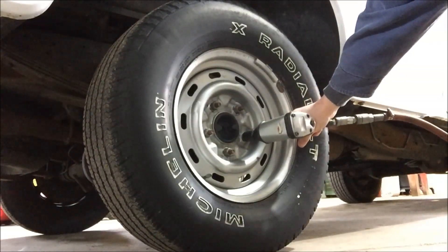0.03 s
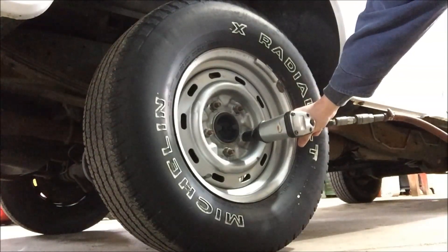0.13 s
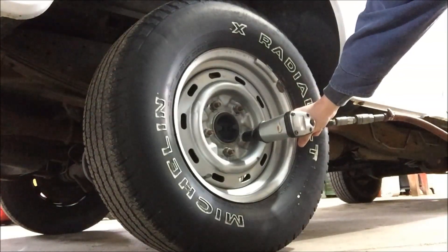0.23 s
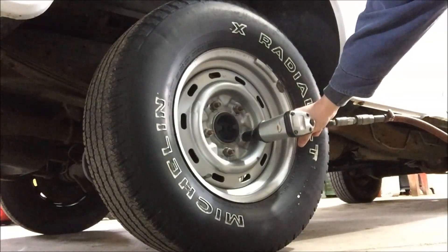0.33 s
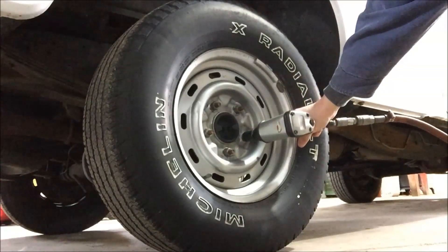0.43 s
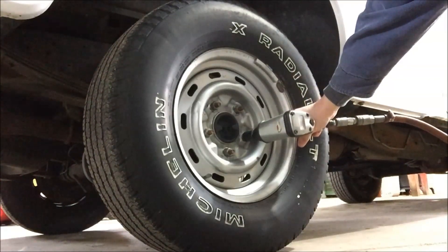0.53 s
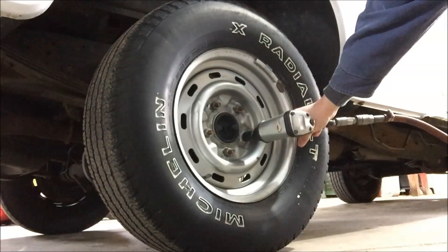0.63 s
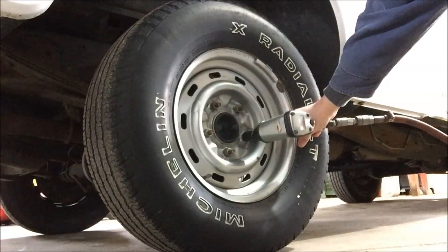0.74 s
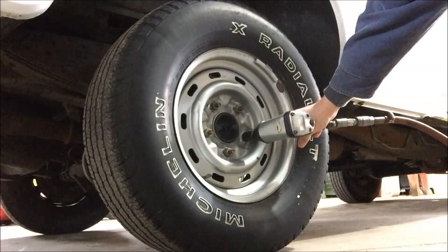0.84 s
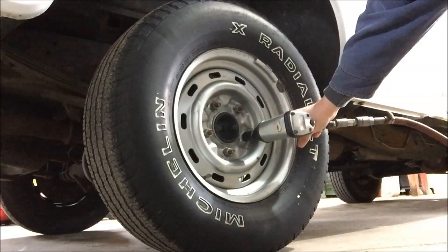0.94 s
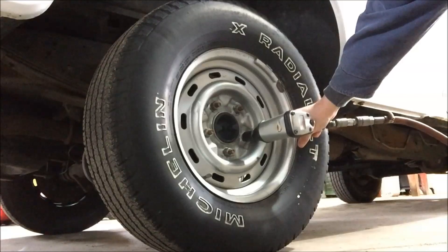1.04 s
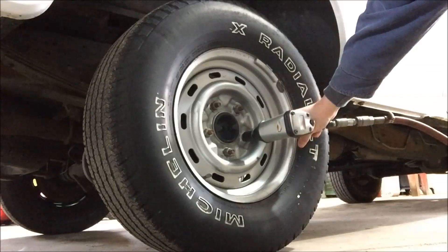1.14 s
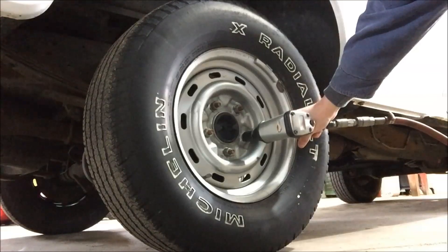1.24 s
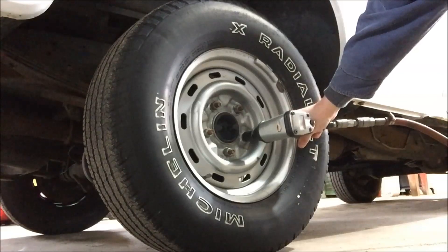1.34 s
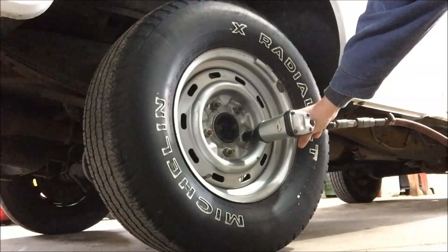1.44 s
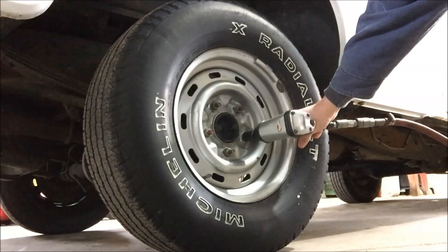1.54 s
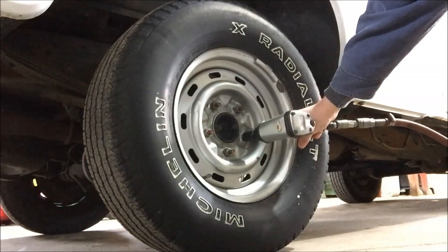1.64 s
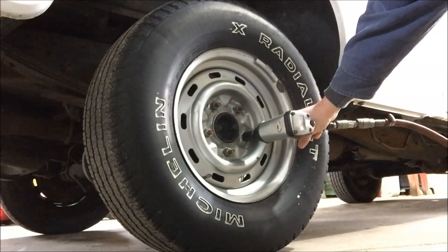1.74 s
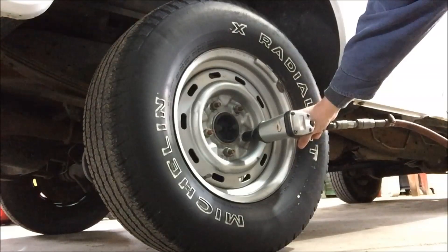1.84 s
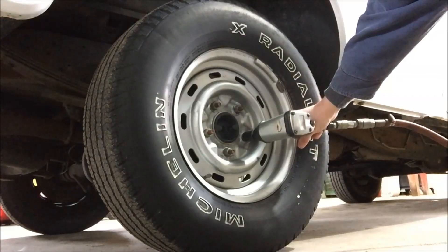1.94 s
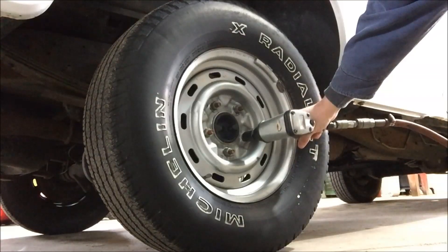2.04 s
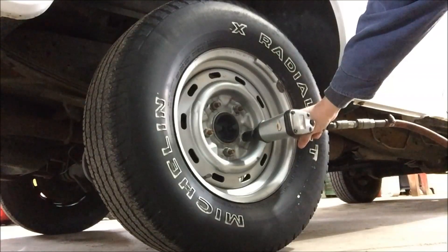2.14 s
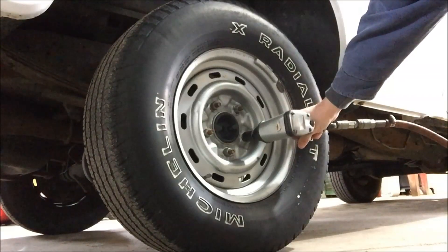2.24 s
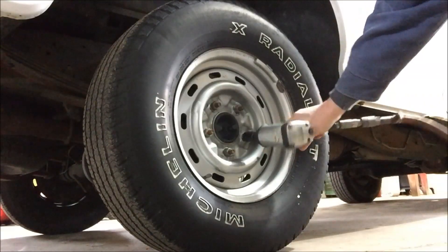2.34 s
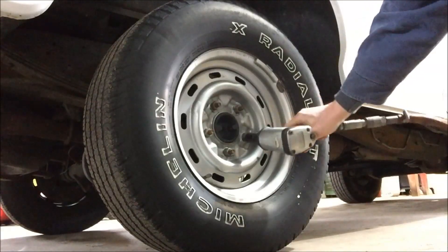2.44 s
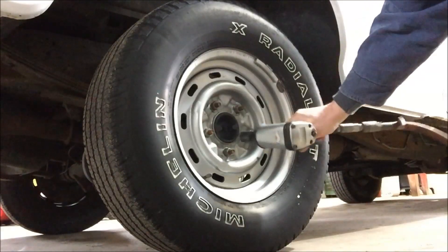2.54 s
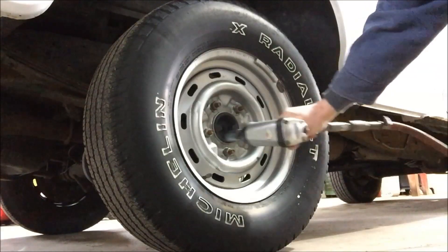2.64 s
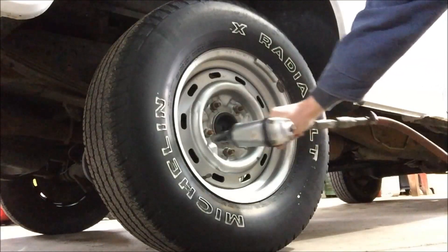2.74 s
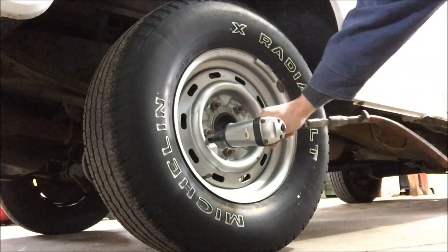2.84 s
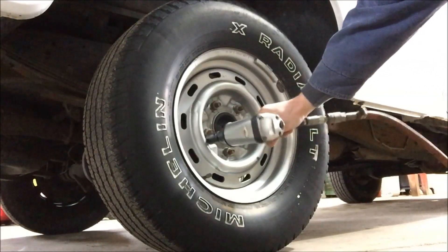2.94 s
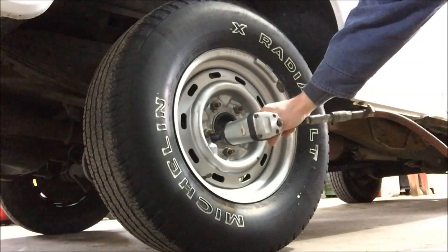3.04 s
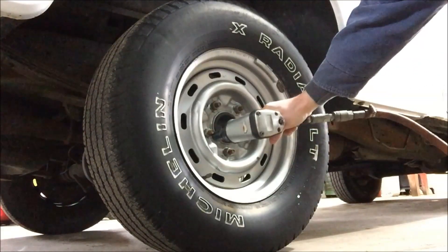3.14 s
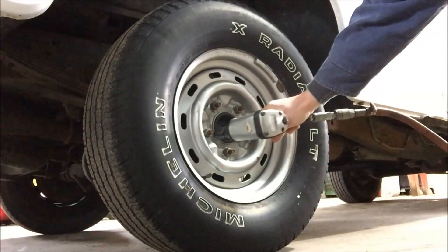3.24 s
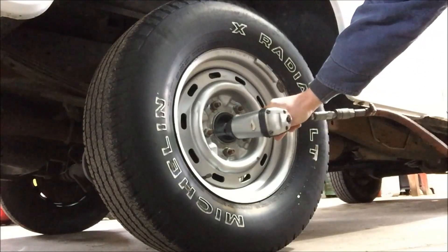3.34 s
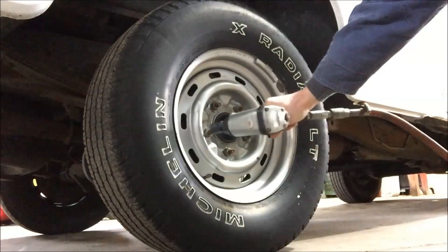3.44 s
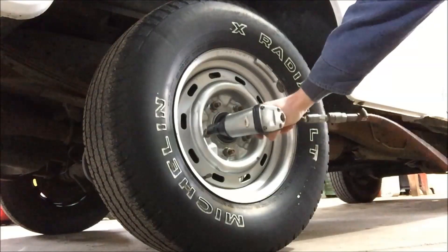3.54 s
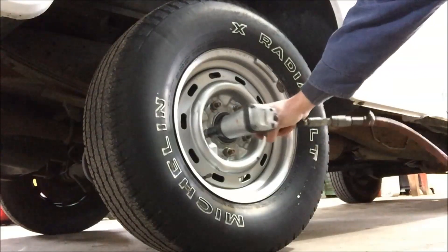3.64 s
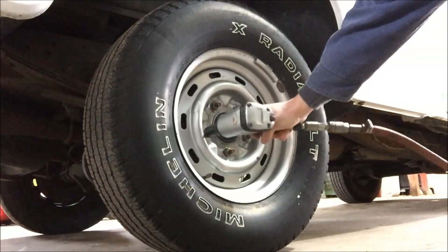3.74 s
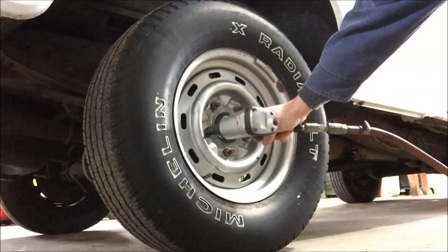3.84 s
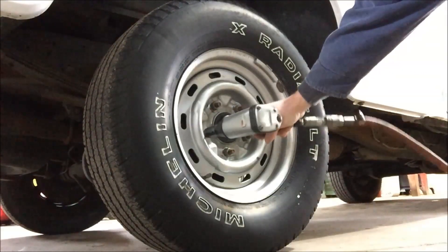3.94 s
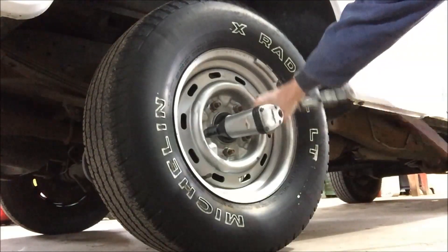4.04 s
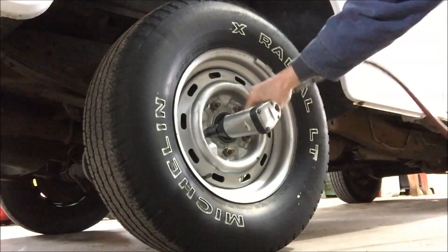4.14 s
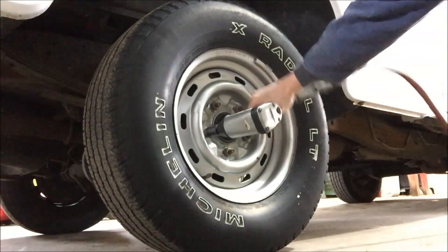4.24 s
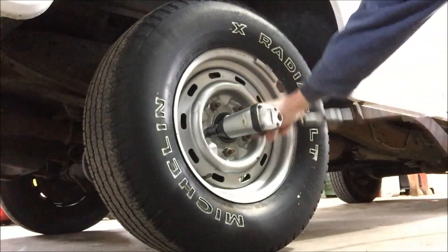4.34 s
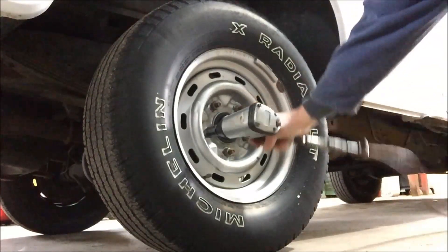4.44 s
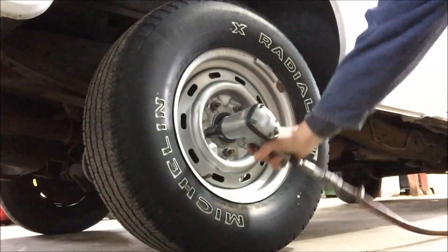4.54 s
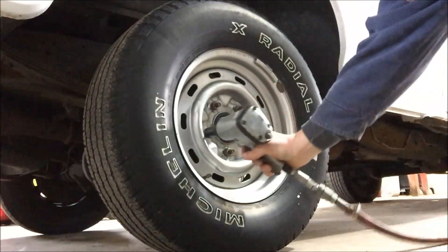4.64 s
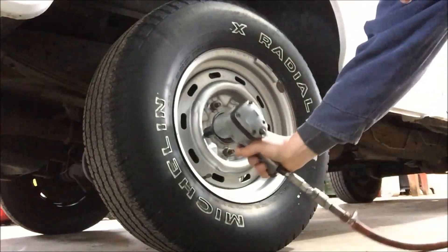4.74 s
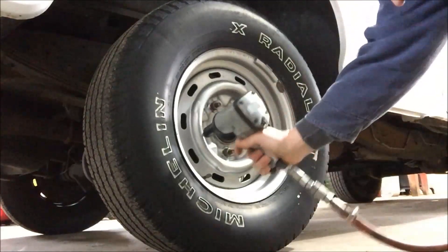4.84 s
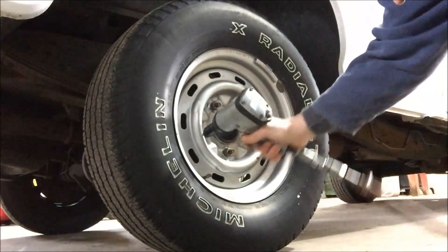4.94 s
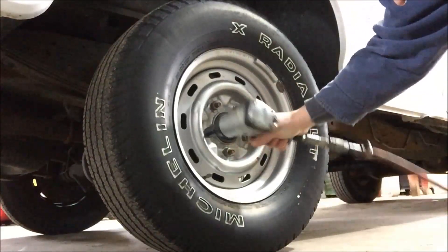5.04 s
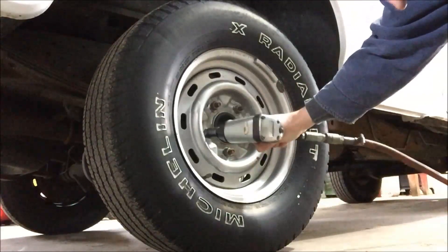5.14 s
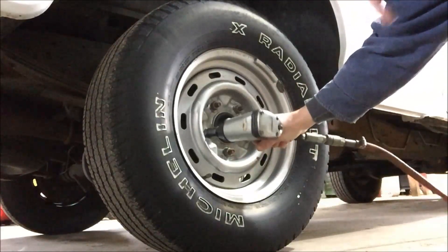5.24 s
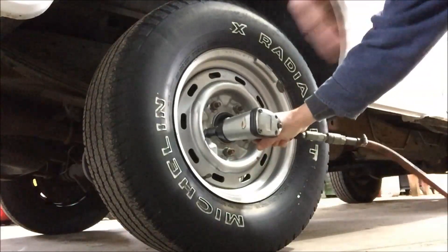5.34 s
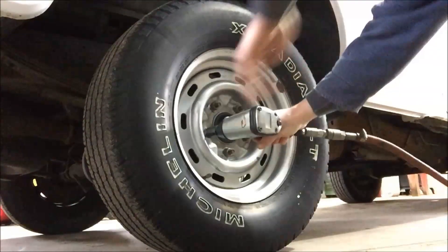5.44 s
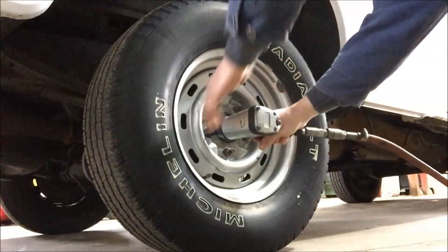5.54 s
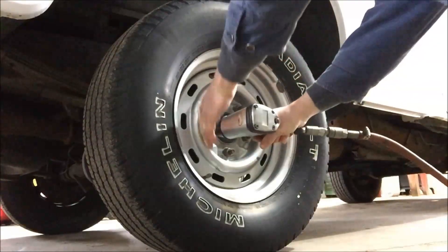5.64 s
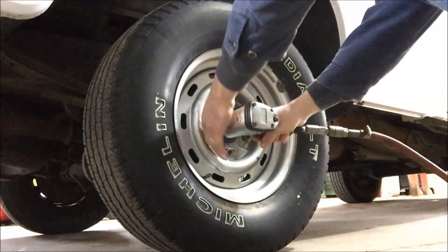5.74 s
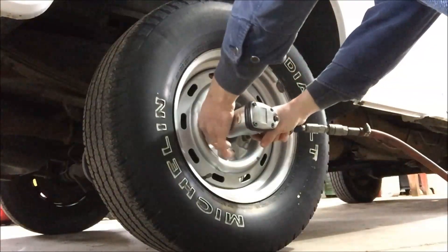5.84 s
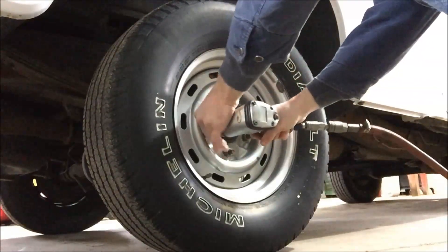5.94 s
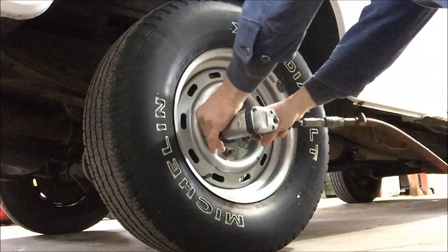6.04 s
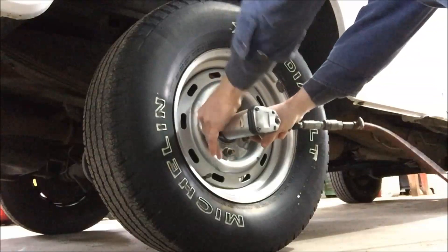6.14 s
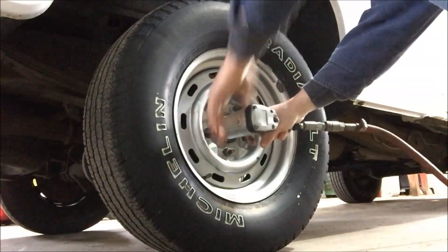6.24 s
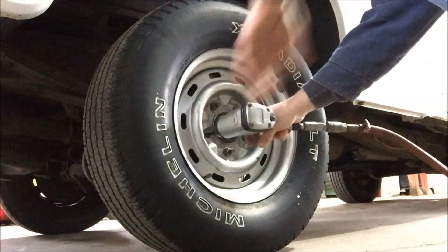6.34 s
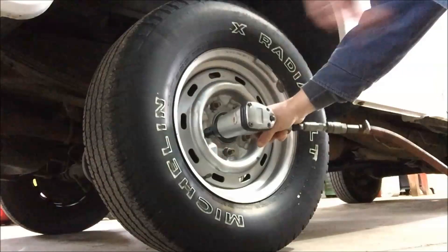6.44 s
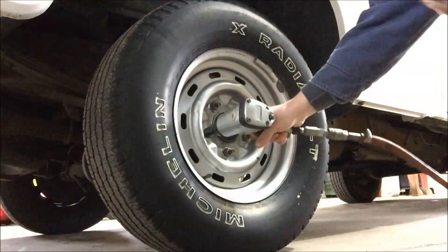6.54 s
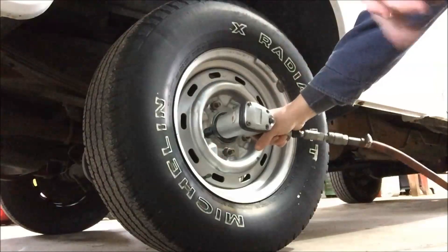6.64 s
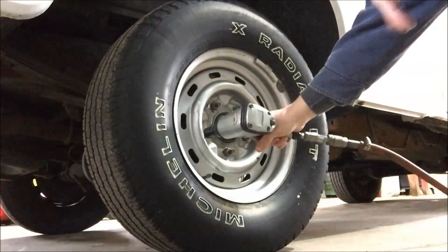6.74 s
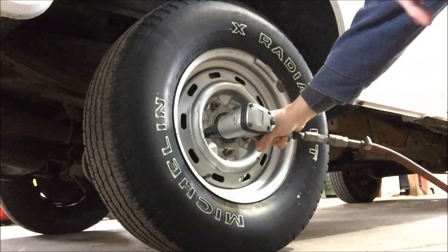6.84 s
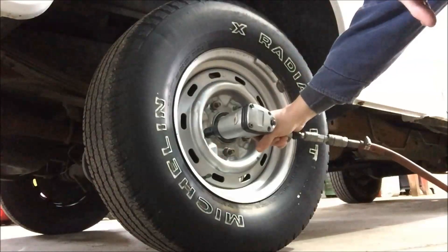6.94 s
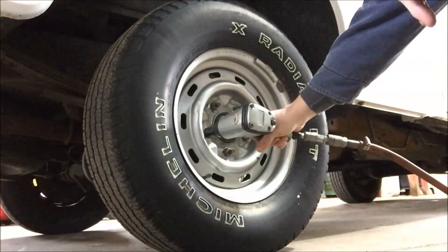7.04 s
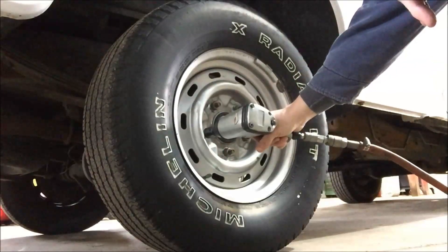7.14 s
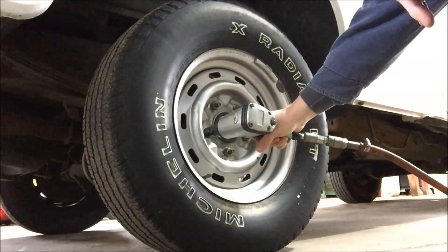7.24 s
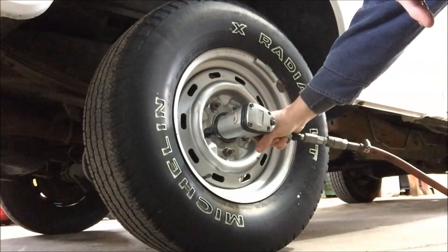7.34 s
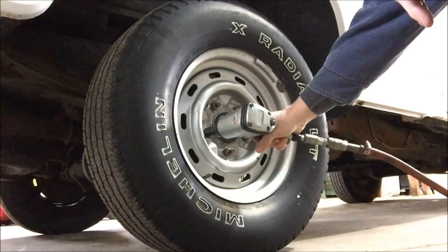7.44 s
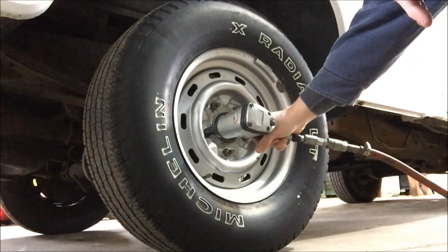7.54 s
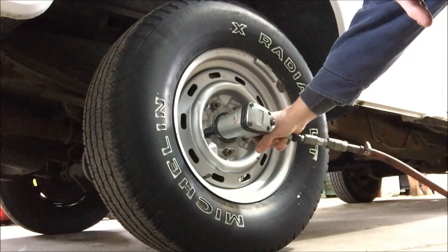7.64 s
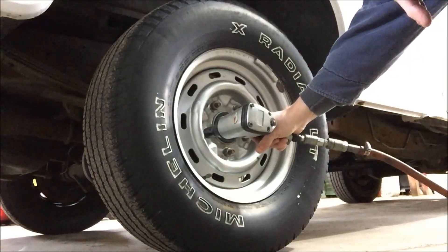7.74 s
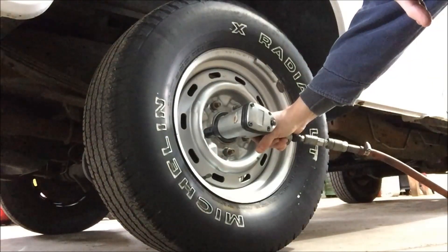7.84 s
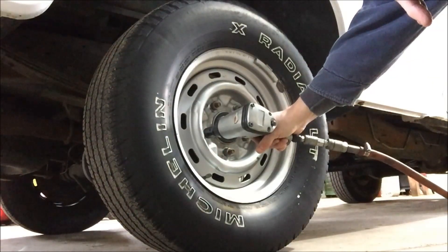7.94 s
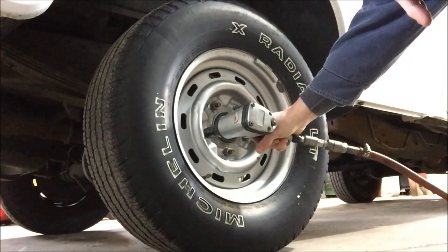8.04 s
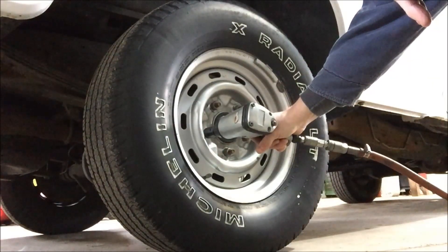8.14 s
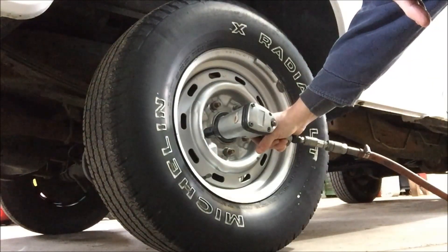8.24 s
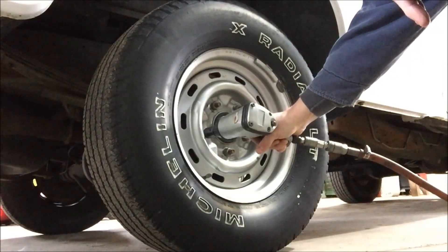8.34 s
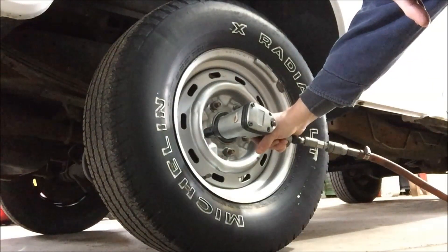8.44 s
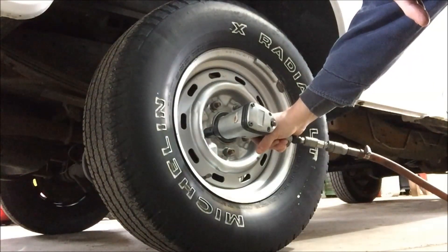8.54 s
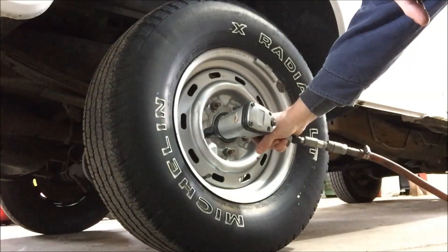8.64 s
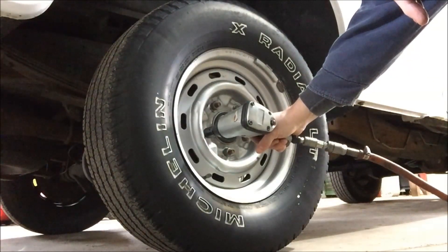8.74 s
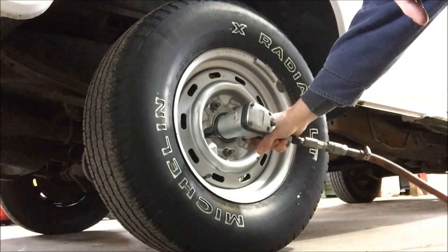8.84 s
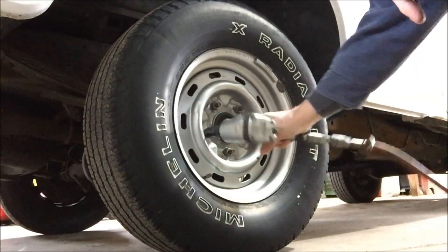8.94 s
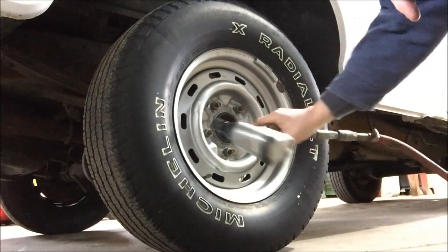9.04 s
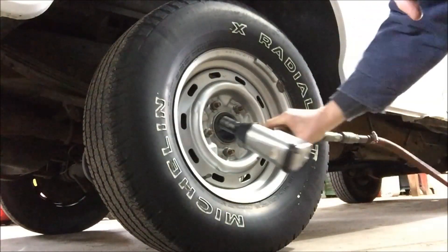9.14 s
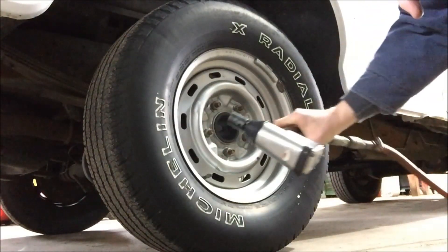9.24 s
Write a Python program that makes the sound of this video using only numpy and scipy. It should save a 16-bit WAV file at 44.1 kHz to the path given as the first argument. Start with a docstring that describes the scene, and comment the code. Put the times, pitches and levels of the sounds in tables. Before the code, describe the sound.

Air impact wrench hammers loudly on a stuck wheel nut, stops, clanks across to another nut, then hammers again in an echoing garage.

```python
"""In a garage, a pneumatic impact wrench hammers on a stuck lug nut, is knocked onto another nut and hammers again.
Each blow is a noisy steel clank, a treble crack, ringing modes of socket and wheel and a low thump.
Between blows the vane motor runs up from a stall in a train of puffs under hissing exhaust.
Jolts, a faint whine of the coasting rotor, a coupling leak, scrapes, dull knocks, soft bumps and room noise follow.
Wrench, jolts, scrapes and dull knocks get echoes and a tail; leak, whine, bumps and room noise stay dry."""
import sys
import numpy as np
from scipy import signal
from scipy.io import wavfile
from scipy.ndimage import uniform_filter1d

SR = 44100
rng = np.random.default_rng(int(sys.argv[2]) if len(sys.argv) > 2 else 0)


def unload_wav(signal):
    """Save mono or channel-first audio to the path in sys.argv[1] as 16-bit WAV at rate SR, clipped to [-1, 1]."""
    wavfile.write(
        sys.argv[1],
        SR,
        np.round(np.clip(np.atleast_2d(signal).T, -1, 1) * 32767).astype(np.int16),
    )


N = 409997
TIME_S = np.arange(N) / SR
NUT_CHANGE_S = 2.8

# Runs of evenly spaced hammer blows. Each row: first blow in seconds, last blow in seconds, number of blows,
# then relative levels of clank, treble crack and motor run-up in dB.
BLOW_RUNS = [(0.036, 0.15, 2, -5.5, -16, -23), (0.242, 0.433, 3, -7, -16, -20.5),
             (0.522, 0.886, 5, -6.5, -15, -19), (0.998, 1.279, 4, -7, -16, -20.5),
             (1.394, 2.208, 8, -6.5, -14.5, -25), (2.302, 2.302, 1, -9, -14, -21.5),
             (6.532, 6.532, 1, -9, -23, -31), (6.558, 6.598, 2, 1, -7, -11),
             (6.634, 6.672, 2, -4.5, -14, -16), (6.783, 7.098, 5, -0.5, -16.5, -23),
             (7.176, 7.283, 2, -4.5, -14, -29), (7.39, 7.468, 2, -5.5, -12.5, -27),
             (7.581, 7.687, 2, -2.5, -15, -29), (7.766, 7.847, 2, -3, -17, -31),
             (7.956, 8.114, 3, -4, -14.5, -27.5), (8.226, 8.305, 2, -4, -14.5, -27.5),
             (8.421, 8.5, 2, -5, -13, -27.5), (8.621, 8.774, 3, -3.5, -14, -29.5),
             (8.886, 8.886, 1, -1.5, -25, -27.5)]
# Second catch of the hammer, a row per nut: delay in seconds, then clank, crack and run-up in dB re the full blow.
SECOND_CATCH = [(.045, -1.5, 2, -8.5), (.036, -6, 0, -5)]
CATCH_MIN_GAP_S, CATCH_MAX_GAP_S = 0.085, 0.2  # shorter: regular blows; longer: motor stopped
BLOW_SPREAD_DB = 0.86

# Trigger pulls. Each row: open in seconds, shut in seconds.
TRIGGER_PULLS = [(-1, 2.328), (6.53, 8.928)]
# Air of each pull: relative level in dB.
PULL_AIR_DB = [-19.5, -18]
LOUD_START_DB, SETTLE_S = 10, 0.14  # the hiss starts louder and settles
VALVE_OPEN_S, VALVE_SHUT_DB_PER_S = 0.011, 1000
VANE_HZ, RUN_UP_S = 172, 0.042  # puff rate at full speed, time constant from a stall

# Jolts from trigger blips and from the socket meeting nuts and wheel. Each row: time in seconds,
# then relative levels of clank, treble crack and wheel thump in dB.
JOLTS = [(2.364, -10, -19, -29), (2.494, -22, -22, -52), (2.631, -30, -46, -51), (2.908, -3.5, -3.5, -11),
         (2.986, -7.5, -20, -20), (3.093, -17, -23, -30.5), (3.149, -19, -24, -34), (3.193, -23, -48, -39),
         (3.335, -31.5, -49, -61), (3.542, -29, -56, -56), (3.589, -2, -5, -14.5), (3.732, -3, -5, -21),
         (3.747, -10, -10, -32), (3.769, -17, -19, -20.5), (3.812, -11.5, -14, -19), (4.05, -25, -44, -33),
         (4.071, -10.5, -19.5, -19), (4.586, -27, -27, -40), (4.62, -29, -43, -35),
         (4.695, -27, -53, -30.5), (5.149, -42, -56, -33), (5.193, -41, -57, -28.5), (5.528, -50, -70, -43),
         (5.979, -30, -60, -52), (6.011, -28, -54, -42), (6.072, -15.5, -26, -33), (6.107, -16.5, -26, -19),
         (6.128, -41, -27, -28), (6.226, -26.5, -58, -53), (8.996, -11.5, -13, -36)]
# Modes of socket and wheel. Each row: frequency in Hz, T60 in seconds before damping,
# then relative levels in dB on the first nut, on the second nut and knocked loose.
STEEL_MODES = [(1015, .3, -21.5, -17.5, -15), (1337, 0.24, -23.5, -16, -18.5),
               (1656, 0.31, -10, -25, -21.5), (1940, 0.34, -14, -14.5, -12.5),
               (2260, .3, -22, -30.5, -14.5), (2800, .1, -18, -11, -11.5), (3097, 0.12, -0.5, 8, 6),
               (3570, 0.087, -18, -10.5, -0.5), (3900, .15, -22.5, -10, -16), (5370, 0.4, -8.5, -19, -20.5),
               (5490, 0.1004, -22.5, -20, -12), (6130, .22, -9.5, -10.5, -17.5),
               (6700, 0.16, -11.5, -13.5, -15.5), (7400, .2, -9.5, -4, -17.5), (8550, .3, -14, -20, -24)]
LOOSE_SEAT = 2
# Rotor coasts. Each row: start in seconds, length in seconds, initial whine in Hz, start and end level in dB.
ROTOR_COASTS = [(2.998, 0.73, 2174, -70, -60), (4.088, 1.2, 2250, -72, -78)]
COAST_SAG_HZ_PER_S = 740

# Coupling leaks while the hose is bent. Each row: start in seconds, end in seconds, level in dB.
HOSE_LEAKS = [(4.6, 5.08, -55.5), (5.4, 5.6, -70), (6.01, 6.21, -59), (9.13, 9.3, -51.5)]
LEAK_RISE_S, LEAK_FALL_DB_PER_S, LEAK_REST_DB, LEAK_SPUTTER_DB = 0.073, 93, -84, 2
# Scrapes of the socket and dull knocks of the tool body on the wheel.
# Each row: start in seconds, end in seconds, relative level in dB.
SCRAPES_AND_KNOCKS = [(3.09, 3.15, -36.5), (4.66, 4.7, -48), (5.152, 5.16, -48), (5.195, 5.222, -53),
                      (5.4, 5.45, -54), (6.05, 6.14, -40)]
SCRAPE_RISE_S, SCRAPE_FALL_DB_PER_S = 0.012, 221
# Shifts of the tool against the wheel. Each row: start in seconds, end in seconds, level in dB.
TOOL_SHIFTS = [(3.0, 3.22, -43.5), (3.7, 4.0, -44), (4.15, 4.28, -49), (4.66, 4.8, -49), (4.92, 5.3, -56),
               (6.1, 6.25, -51), (9.05, 9.3, -50)]
SHIFT_RISE_S, SHIFT_FALL_DB_PER_S, SHIFT_REST_DB = 0.14, 54, -64.5
BUMPS_PER_S, BUMP_DB = 9, 4  # bump level re the rub

# Clank of the gripped nut. Each row: frequency in Hz, relative gain in dB.
FIRST_NUT_CLANK = [(150, -9.5), (330, 2.5), (520, -8), (1000, -4.5), (1400, -12), (1800, -4), (2500, -4.5),
                   (3600, 0.5), (4900, -7.5), (7000, -7.5), (12000, -27.5)]
SECOND_NUT_CLANK = [(150, -4.5), (330, -5), (600, -12.5), (1000, -3), (1500, -12.5), (2000, -6.5),
                    (2400, -5), (2850, 3), (3800, -0.5), (4800, -9.5), (7000, -4.5), (12000, -25)]
# Treble crack of a blow. Each row: frequency in Hz, relative gain in dB.
BLOW_CRACK = [(2500, -25), (4500, -14), (6200, 0.5), (7600, 2), (10300, -3), (12000, 1), (15800, -8)]
# Vane puffs on each nut. Each row: frequency in Hz, relative gain in dB.
FIRST_NUT_PUFF = [(25, -37.5), (60, -5.5), (120, -11), (165, -4.5), (200, -8), (270, -1.5), (350, 1),
                  (460, -8), (650, -8.5), (1050, -12), (1600, -27.5), (6000, -57)]
SECOND_NUT_PUFF = [(25, -30), (60, -6.5), (120, -8), (165, -5.5), (200, -3.5), (240, 3), (340, 0.5),
                   (460, -10.5), (700, -14), (1100, -16.5), (2000, -32), (6000, -61)]
# Exhaust hiss on each nut. Each row: frequency in Hz, relative gain in dB.
FIRST_NUT_EXHAUST = [(300, -20), (900, -17), (1450, -6.5), (1750, -2.5), (2400, -3.5), (3200, -0.5),
                     (4200, 1), (4900, -4.5), (6200, -0.5), (7600, 2.5), (9000, -1.5), (10300, -6.5),
                     (11800, -1.5), (15800, -10)]
SECOND_NUT_EXHAUST = [(300, -7.5), (900, -14.5), (1500, -7), (2350, -3.5), (2800, 5.5), (3600, 3.5),
                      (4800, 0), (5800, 2.5), (7400, 3), (8600, -0.5), (9500, 3), (10400, -3.5),
                      (11600, 0.5), (15800, -4)]
# Clank and treble crack of a jolt. Each row: frequency in Hz, relative gain in dB.
JOLT_CLANK = [(150, -16), (330, -1.5), (480, 0), (620, -3), (800, -2.5), (1200, 0.5), (1550, -5.5),
              (2050, -0.5), (2500, 0.5), (3100, 1.5), (3800, -0.5), (4800, -11.5), (7000, -10),
              (12000, -33)]
JOLT_CRACK = [(2500, -27.5), (4500, -15), (6600, -1.5), (8000, -2), (10300, -3.5), (12000, -7),
              (15800, -14.5)]
# Low shudder and rub of the wheel. Each row: frequency in Hz, relative gain in dB.
WHEEL_THUMP = [(25, -40.5), (60, -15), (130, -9.5), (190, -6), (240, 0), (300, -0.5), (380, -11),
               (500, -29), (1000, -27), (4000, -63)]
# Leaking air. Each row: frequency in Hz, relative gain in dB.
LEAK_HISS = [(500, -14.0), (2200, -2), (5000, -1), (8000, 2), (12000, 1.5), (15000, 4.5)]
# Scrapes and dull knocks. Each row: frequency in Hz, relative gain in dB.
SCRAPE_NOISE = [(300, -16.5), (600, -7.5), (850, 2.5), (1200, -0.5), (1600, -7.5), (3000, -12.5),
                (7000, -28), (14000, -32)]
# Quiet of the garage. Each row: frequency in Hz, relative gain in dB.
ROOM_NOISE = [(15, -43.5), (25, -9.5), (75, 10.5), (231, -9), (326, -11.5), (769, -22.5), (1630, -18.5),
              (1760, -16.5), (2930, -18.5), (4750, -24), (15000, -35.5)]
ROOM_NOISE_DB = -55
# Decay of the garage tail. Each row: frequency in Hz, T60 in seconds.
GARAGE_T60 = [(100, 1), (280, 0.67), (600, 0.72), (1500, 1), (3200, 0.67), (6400, 0.71), (9000, 0.39),
              (14000, .38)]
BAND_LIMIT_HZ = 15880


def blows():
    """Rows of time in s and clank, crack, run-up in dB: full blows, and a second catch in long gaps of a run."""
    full = np.array([(s, *levels_db) for first, last, count, *levels_db in BLOW_RUNS
                     for s in np.linspace(first, last, round(count))])
    gap_s = np.diff(full[:, 0])
    slipped = full[:-1][(gap_s > CATCH_MIN_GAP_S) & (gap_s < CATCH_MAX_GAP_S)]
    nut = (slipped[:, 0] > NUT_CHANGE_S).astype(int)
    rows = np.vstack([full, slipped + np.array(SECOND_CATCH)[nut]])
    rows = rows[np.argsort(rows[:, 0])]
    uneven_db = BLOW_SPREAD_DB * rng.standard_normal(rows[:, 1:].shape)
    return np.column_stack([rows[:, 0], rows[:, 1:] + uneven_db])


def airflow():
    """Gain of the air: the hiss starts louder, settles within a fraction of a second and dies as the trigger shuts."""
    flow = np.zeros(N)
    for (start, end), db in zip(TRIGGER_PULLS, PULL_AIR_DB):
        extra_db = LOUD_START_DB * np.exp(-np.maximum(TIME_S - start, 0) / SETTLE_S)
        flow += held([(start, end, db)], VALVE_OPEN_S, VALVE_SHUT_DB_PER_S) * amp(extra_db)
    return flow


def hammer(strikes, air):
    """Full blows on the anvil; in longer gaps the hammer rebounds and clips the anvil lightly."""
    s, clank_db, crack_db, run_up_db = strikes.T
    force = contacts(s, clank_db - 5.5, chatter_s=0.0072, ring_s=0.025, ring_db=-11.5, rise_s=0.002496)
    crack = contacts(s, crack_db + 3.5, chatter_s=0.007, ring_s=0.01, ring_db=-23.5, rise_s=0.002)

    # rebounds split each gap into steps of about 32 ms
    rebounds_s = np.concatenate([np.linspace(a, b, max(round((b - a) / 0.032), 1) + 1)[1:-1]
                                 for a, b in zip(s, s[1:])])
    late, size = rng.standard_normal((len(rebounds_s), 2)).T
    ticks = air * contacts(rebounds_s + 0.002 * late, 6 + 1.8 * size, chatter_s=0.005, ring_s=0.01, ring_db=-24.5)

    clank = colour_by_nut(force + amp(-9.5) * ticks, FIRST_NUT_CLANK, SECOND_NUT_CLANK)
    nut = (s > NUT_CHANGE_S).astype(int)
    ring = ringing(s, clank_db - 17.5, nut, damping=1, spread_db=1.5)
    thump = thumps(s, run_up_db - 2.0, hz=255.2, rise_s=0.0041)
    return clank + ring + colour(crack + ticks, BLOW_CRACK) + thump


def motor(strikes, air):
    """Each blow stalls the rotor; it runs up again, and every vane lets out a puff and a spit of hiss."""
    s, _, _, run_up_db = strikes.T
    count = np.searchsorted(s, TIME_S)
    coming = np.minimum(count, len(s) - 1)
    since_s = TIME_S - np.append(0, s)[count]
    speed = np.tanh(since_s / RUN_UP_S)
    uneven = (1 + 0.06 * rng.standard_normal(len(s)))[coming]
    turns = np.cumsum(VANE_HZ * speed * uneven) / SR
    # the hammer meets the anvil at a fixed rotor angle
    vanes = turns - turns[(s * SR).astype(int)][coming]
    passing = np.diff(np.floor(vanes), prepend=0) > 0
    trigger = np.minimum(air / amp(-22.0), 1)
    puffs = passing * speed ** 2 * amp(run_up_db[coming] + 25.5) * trigger
    pulsing = evened(1 + 0.5 * np.exp(-(vanes % 1) / 0.21))
    spit = air * pulsing * rng.standard_normal(N)
    exhaust = amp(1.0) * colour_by_nut(spit, FIRST_NUT_EXHAUST, SECOND_NUT_EXHAUST)
    return colour_by_nut(puffs + amp(-10.5) * speed * spit, FIRST_NUT_PUFF, SECOND_NUT_PUFF), exhaust


def jolts():
    """Socket and hammer clank and ring on freely, and wheel and tyre thump under them."""
    s, clank_db, crack_db, thump_db = np.transpose(JOLTS)
    clank = contacts(s, clank_db - 8.5, chatter_s=0.0067, ring_s=0.0364, ring_db=-16.5, rise_s=0.002276, grain_db=5)
    crack = contacts(s, crack_db - 7.0, chatter_s=0.0053, ring_s=0.012, ring_db=-21.0, rise_s=0.001, grain_db=3.0)
    shudder = contacts(s, thump_db - 7.5, chatter_s=0.013, ring_s=0.094, ring_db=-7.0)
    ring = ringing(s, clank_db - 19.5, [LOOSE_SEAT] * len(s), damping=1.15, spread_db=1.5)
    steel = colour(clank, JOLT_CLANK) + ring + colour(crack, JOLT_CRACK)
    return steel + colour(shudder, WHEEL_THUMP) + thumps(s, thump_db + 0.5, hz=248.0, rise_s=0.0046)


def contacts(times_s, levels_db, chatter_s, ring_s, ring_db, rise_s=0.0006, grain_db=1.0):
    """Loose steel parts chatter for a few ms at each contact, then die away."""
    t, out = np.arange(SR // 6) / SR, np.zeros(N)
    decay = np.exp(-(t / chatter_s) ** 2) + amp(ring_db) * np.exp(-t / ring_s)
    shape = (1 - np.exp(-t / rise_s)) * decay
    for s, db in zip(times_s, levels_db):
        add(out, s - rise_s / 2, amp(db) * shape * grainy(len(t), grain_db))
    return out


def grainy(size, grain_db):
    """Noise whose strength jumps every half millisecond, as in the tiny collisions of rough steel."""
    strength = amp(grain_db * np.clip(rng.standard_normal(size // 22 + 1), -2, 2))
    return evened(np.repeat(strength, 22)[:size]) * rng.standard_normal(size)


def ringing(times_s, levels_db, seats, damping, spread_db):
    """Each hit rings socket and wheel; the seat shifts a little every time, and the modes with it."""
    hz, t60_s, *seat_db = np.transpose(STEEL_MODES)
    t, out = np.arange(SR // 3) / SR, np.zeros(N)
    modes = amp(-60 * damping * t / t60_s[:, None]) * np.exp(2j * np.pi * hz[:, None] * t)
    for s, db, seat in zip(times_s, levels_db, seats):
        size_db = seat_db[seat] + spread_db * rng.standard_normal(len(hz))
        start_phase = np.exp(2j * np.pi * rng.random(len(hz)))
        ring = (amp(db + size_db) * start_phase) @ modes
        shift_hz = 4 * rng.standard_normal()
        shifted = (ring * np.exp(2j * np.pi * shift_hz * t)).real
        add(out, s, shifted * (1 - np.exp(-t / 0.001)))
    return out


def thumps(times_s, levels_db, hz, rise_s):
    """Each jolt pushes the wheel, which answers with a few low cycles."""
    t, out = np.arange(SR // 8) / SR, np.zeros(N)
    swell = t / rise_s * np.exp(1 - t / rise_s)
    for s, db in zip(times_s, levels_db):
        add(out, s, amp(db) * swell * np.sin(2 * np.pi * hz * rng.uniform(0.894, 1.1) * t))
    return out


def coasting():
    """Two fuzzy, fluttering orders of the spinning rotor sink as friction slows it."""
    out = np.zeros(N)
    lowpass = signal.butter(2, 45, fs=SR, output="sos")
    for start, length, hz, start_db, end_db in ROTOR_COASTS:
        t = np.arange(0, length, 1 / SR)
        phase = 2 * np.pi * np.cumsum(hz - COAST_SAG_HZ_PER_S * t) / SR
        gain = amp(np.linspace(start_db, end_db, len(t))) * signal.windows.tukey(len(t), 0.1)
        for order in (1, 7 / 5):
            complex_noise = [1, 1j] @ rng.standard_normal((2, N))
            flutter = signal.sosfilt(lowpass, complex_noise)[:len(t)]
            add(out, start, gain * evened((flutter * np.exp(1j * order * phase)).real))
    return out


def scrapes_and_knocks():
    """Scrapes of the socket and dull knocks of the tool body on the wheel: noise in random steps of strength."""
    steps = amp(6 * np.clip(rng.standard_normal(N // 200 + 1), -2, 2)).repeat(200)[:N]
    roughness = evened(uniform_filter1d(steps, size=60))
    noise = colour(roughness * rng.standard_normal(N), SCRAPE_NOISE)
    gain = held(SCRAPES_AND_KNOCKS, SCRAPE_RISE_S, SCRAPE_FALL_DB_PER_S)
    return amp(-3.0) * garage(gain * noise, early_db=-9, tail_db=-19)


def shifting():
    """The tool rubs and softly bumps the wheel: low noise and random thumps under one gain."""
    bumps_s = TIME_S[rng.random(N) < BUMPS_PER_S / SR]
    bumps = thumps(bumps_s, np.full(len(bumps_s), BUMP_DB), hz=270.4, rise_s=0.007)
    gain = held(TOOL_SHIFTS, SHIFT_RISE_S, SHIFT_FALL_DB_PER_S) + amp(SHIFT_REST_DB)
    return gain * (hiss(WHEEL_THUMP) + bumps)


def leak():
    """Air escapes turbulently at the coupling: sputtering hiss over a faint constant leak."""
    sputter_db = LEAK_SPUTTER_DB * evened(uniform_filter1d(rng.standard_normal(N), size=1100))
    gain = held(HOSE_LEAKS, LEAK_RISE_S, LEAK_FALL_DB_PER_S) + amp(LEAK_REST_DB)
    return hiss(LEAK_HISS) * amp(sputter_db) * gain


def room_noise():
    """Quiet of the garage: steady noise, mostly bass."""
    return amp(ROOM_NOISE_DB) * hiss(ROOM_NOISE)


def garage(x, early_db, tail_db):
    """Quick echoes off floor and truck body, then a tail in which each band dies at its own speed."""
    early = np.zeros(SR // 20)
    at = rng.integers(SR // 400, SR // 40, size=12)
    early[at] = rng.choice([-1., 1.], len(at)) * np.exp(-at / SR / 0.031)
    taps = rng.standard_normal(SR) * np.minimum(np.arange(SR) / SR / 0.024, 1)
    hz, t, z = signal.stft(taps, SR, nperseg=256)
    decay = amp(-60 * t / read(GARAGE_T60, hz)[:, None])
    tail = signal.istft(z * decay, SR, nperseg=256)[1]
    wet = np.zeros(N)
    for db, echo in [(early_db, early), (tail_db, tail)]:
        wet += amp(db) * signal.oaconvolve(x, echo / np.linalg.norm(echo))[:N]
    return x + wet


def held(rows, rise_s, fall_db_per_s):
    """Summed gain of rows (start s, end s, dB): swells up to the start, holds, dies away after the end."""
    gain = np.zeros(N)
    for start, end, db in rows:
        rise = np.clip(1 + (TIME_S - start) / rise_s, 0, 1) ** 2
        gain += amp(db - fall_db_per_s * np.maximum(TIME_S - end, 0)) * rise
    return gain


def colour_by_nut(x, first, second):
    """The gripped nut sets the spectrum: one filter before the change of nut, one after."""
    return colour(x * (TIME_S < NUT_CHANGE_S), first) + colour(x * (TIME_S >= NUT_CHANGE_S), second)


def colour(x, spectrum, size=4096):
    """Causal minimum-phase filter with the given spectrum; white noise keeps its power."""
    log_gain = np.log(amp(read(spectrum, abs(np.fft.fftfreq(size, 1 / SR)))))
    taps = np.fft.ifft(np.exp(np.conj(signal.hilbert(log_gain)))).real[:size // 2]
    return signal.oaconvolve(x, taps / np.linalg.norm(taps))[:N]


def hiss(spectrum):
    """Steady coloured noise."""
    return colour(rng.standard_normal(N), spectrum)


def read(points, hz):
    """Table value at hz, interpolated over log frequency."""
    f, value = np.transpose(points)
    return np.interp(np.log(hz + 1), np.log(f + 1), value)


def add(mix, start_s, sound):
    """Mix a sound in at its start time, in place."""
    part = mix[max(round(start_s * SR), 0):][:len(sound)]
    part += sound[:len(part)]


def amp(db):
    """Amplitude of a level in dB."""
    return 10 ** (np.asarray(db) / 20)


def evened(x):
    """Scale to unit RMS."""
    return x / np.sqrt(np.mean(x ** 2) + 1e-20)


def scene():
    """Sum of wrench, jolts, coasting and handling over room noise, the same in both channels."""
    strikes, air = blows(), airflow()
    puffs, exhaust = motor(strikes, air)
    wrench = garage(hammer(strikes, air) + exhaust, early_db=-12.0, tail_db=-12.5)
    wrench += garage(puffs, early_db=-15.5, tail_db=-14)
    knocked = garage(jolts(), early_db=-6.5, tail_db=-15.0)
    mono = wrench + knocked + coasting() + scrapes_and_knocks() + shifting() + leak() + room_noise()
    return np.array([mono, mono])


def record(dry):
    """The microphone drops the deep bass and the loudest peaks clip; then the band limit."""
    thinned = signal.sosfilt(signal.butter(3, 48, "highpass", fs=SR, output="sos"), dry)
    clipped = np.clip(thinned, -1, 1)
    lowpass = signal.firwin(601, BAND_LIMIT_HZ, window=("kaiser", 8), fs=SR)
    return signal.oaconvolve(clipped, lowpass[None], "same")


dry = scene()
out = record(dry)
unload_wav(out)
```